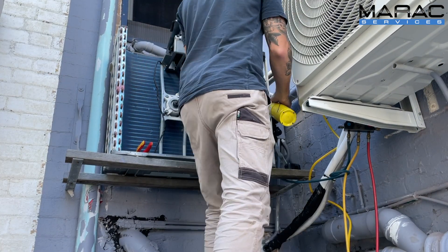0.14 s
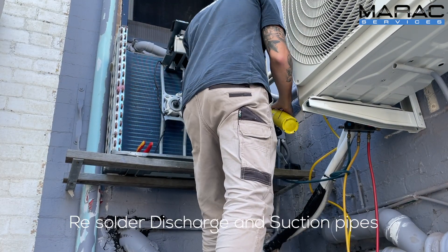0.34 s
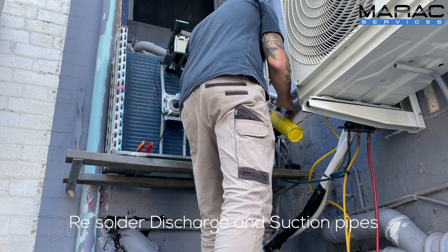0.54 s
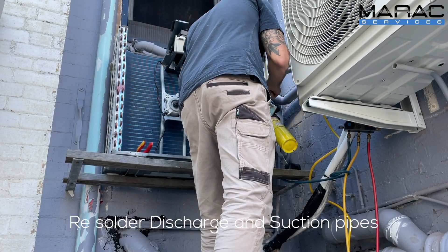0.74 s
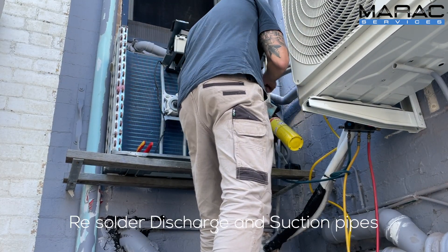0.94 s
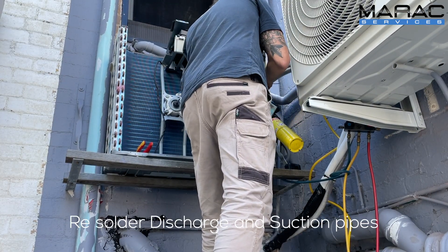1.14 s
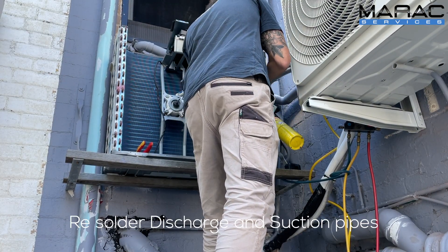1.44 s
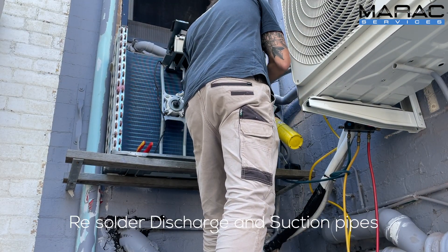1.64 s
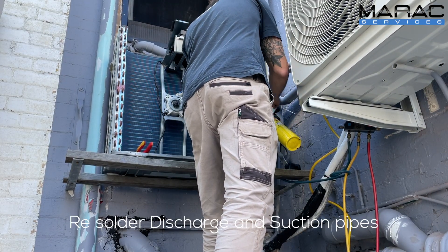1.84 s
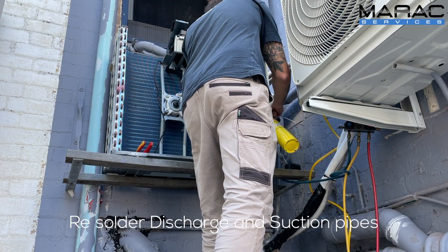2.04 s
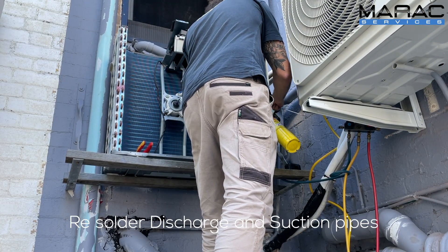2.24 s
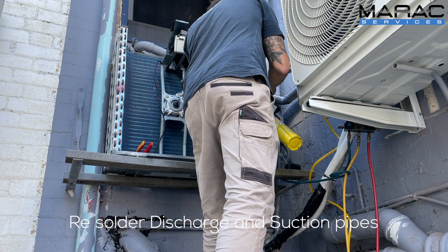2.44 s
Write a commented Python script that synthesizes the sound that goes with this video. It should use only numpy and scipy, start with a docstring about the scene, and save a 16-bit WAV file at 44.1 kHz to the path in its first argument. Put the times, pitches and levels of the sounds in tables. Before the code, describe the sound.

A handheld gas torch is knocked about, then its igniter snaps, gas hisses faintly, and the flame pops into a fluttering roar that cuts out briefly and returns, in stereo in an outdoor walled corner.

```python
"""Hand torch lit in an outdoor corner

Outdoors, in a corner of walls and sheet metal, a torch clacks and bumps in handling: noise bursts with decaying sines.
Its igniter snaps, cold gas whistles through the burner tube (resonant noise), and the flame catches with a pop.
The flame is fluttering, coloured noise: it roars, cuts out briefly, returns, sinks and settles.
Behind it lie a low outdoor rumble and a faint high whine; the stereo microphone rolls off at the very top."""
import sys
import numpy as np
from scipy.fft import rfft, irfft, next_fast_len
from scipy.io import wavfile
from scipy.ndimage import map_coordinates

SR = 44100
rng = np.random.default_rng(int(sys.argv[2]) if len(sys.argv) > 2 else 0)


def file_out(sig):
    """Save sig as 16-bit WAV at sys.argv[1]."""
    # one column per channel
    cols = np.atleast_2d(sig).T
    # limit, then scale
    lim = np.clip(cols, -1, 1)
    pcm = np.round(lim * 32767).astype(np.int16)
    wavfile.write(sys.argv[1], SR, pcm)


N = 114660

# Burning torch, before the trims in flame(): (time [s], roar level [dB], gas hiss level [dB])
FLAME_LEVELS = [(1.336, -95, -68), (1.344, -47, -62.5), (1.372, -51, -70.5), (1.394, -46.5, -67.5),
                (1.43, -49, -68.5), (1.585, -48.5, -69), (1.62, -68.5, -84), (1.662, -93, -100),
                (1.688, -48.5, -68.5), (1.76, -47, -65.5), (1.822, -49.5, -69.5), (1.868, -67, -77),
                (1.98, -62.5, -75.5), (2.03, -51.5, -69.5), (2.25, -48.5, -67.5), (2.6, -48.5, -66.5)]
# Colour of the flame's roar: (frequency [Hz], level [dB])
ROAR_COLOUR = [(60, -25), (150, -8), (280, -15.5), (450, -16.5), (690, -13), (800, 0), (1100, -7.5),
               (1600, -8.5), (2300, -17.5), (3500, -21.5), (6000, -42), (9000, -55)]
# Colour of the flame's gas hiss: (frequency [Hz], level [dB])
HISS_COLOUR = [(1000, -20), (2500, -4.5), (3800, -2), (5000, -2.5), (6600, 2), (7300, -8.5), (8500, -1),
               (10500, -13), (12800, -14.5), (13900, -25.5)]
# Resonances of the flame in its corner: (frequency [Hz], width [Hz], lift [dB])
CORNER_RESONANCES = [(391, 46, 12.5), (536, 24, 11), (1027, 64, 10.5), (1301, 148, 8), (1550, 95, -2.5),
                     (1721, 47, 10), (2118, 38, 8), (2454, 67, 6.5), (2844, 51, 6.5), (3340, 50, 9.5),
                     (3590, 85, 9.5), (4285, 250, 3), (4564, 88, 8.5), (4903, 165, 10.5)]
# Lean of the flame across the stereo image: (frequency [Hz], left over right [dB])
FLAME_LEAN = [(200, -4.5), (950, 0), (1650, -0.5), (2900, 1), (5000, 3.5), (8000, 0)]


def flame(flutter_db=1.0, flutter_rate=110, hiss_flutter_db=1.0, roar_db=1.5, hiss_db=4.5):
    """Turbulent roar and gas hiss, fluttering together and coloured by the corner."""
    roar_gain, hiss_gain = gains(FLAME_LEVELS)
    flutter = wobble(flutter_rate)

    def roar_colour(hz):
        return along(ROAR_COLOUR, hz) + lifts(CORNER_RESONANCES, hz)

    def hiss_colour(hz):
        return along(HISS_COLOUR, hz) + lifts(CORNER_RESONANCES, hz) * (hz > 2000)

    def lean(hz):
        return amp(along(FLAME_LEAN, hz) * np.array([[.5], [-.5]]))

    roar = rush(roar_colour) * roar_gain * amp(roar_db + flutter_db * flutter)
    hiss = rush(hiss_colour, comb_db=4.0) * hiss_gain * amp(hiss_db + hiss_flutter_db * flutter)
    return filtered(roar + hiss, lean)


# Level of the low rumble of combustion: (time [s], level [dB])
COMBUSTION_LEVEL = [(1.34, -65), (1.8, -63.5), (2.05, -61), (2.6, -57.5)]
# Colour of that rumble: (frequency [Hz], level [dB])
COMBUSTION_COLOUR = [(30, -16), (90, 2.5), (175, 2), (260, -11), (390, -7), (560, -6), (900, -42)]


def combustion():
    """Low noise from the burning gas, building once the flame is lit."""
    return gains(COMBUSTION_LEVEL)[0] * rush(lambda hz: along(COMBUSTION_COLOUR, hz))


# Flow of unlit gas: (time [s], level [dB])
COLD_GAS_LEVEL = [(.96, -100), (1.0, -81), (1.04, -67.5), (1.15, -66.5), (1.335, -67.5), (1.35, -110)]
# Colour of the unlit gas: (frequency [Hz], level [dB])
COLD_GAS_COLOUR = [(400, -1), (1100, 10), (1600, -5.5), (2500, -1), (5600, 1.5), (6700, -0.5), (7400, 11.5),
                   (9000, 3), (12600, -6), (13900, -10)]
# Resonances of the burner tube: (frequency [Hz], width [Hz], lift [dB])
TUBE_RESONANCES = [(1990, 220, 14), (2866, 110, 15), (3930, 110, 10), (4780, 98, 12), (5070, 350, 10.7),
                   (6280, 510, 14.5)]
# The tube's whistle, firming up just before ignition: (time [s], level [dB])
TUBE_WHISTLE_LEVEL = [(1.05, -93), (1.24, -84), (1.28, -77.5), (1.335, -80), (1.35, -110)]
WHISTLE_HZ, WHISTLE_WIDTH_HZ = 2940, 76


def cold_gas():
    """Unlit gas blows through the hollow burner tube, which whistles faintly."""
    jet = rush(lambda hz: along(COLD_GAS_COLOUR, hz) + lifts(TUBE_RESONANCES, hz), comb_db=2.5)
    whistle = rush(lambda hz: narrow_band(hz, WHISTLE_HZ, WHISTLE_WIDTH_HZ))
    return gains(COLD_GAS_LEVEL)[0] * jet + gains(TUBE_WHISTLE_LEVEL)[0] * whistle


# Igniter snap, then pops of the catching flame: (time [s], level at peak [dB], rise [s], t60 [s],
# tilt [dB per octave], ring [dB], left over right [dB], fizz above 7200 Hz [dB])
SNAP_HITS = [(.9265, -40.5, 0.001, 0.14, 0, 5.5, 1, -9), (.932, -28.5, 0.0017, 0.062, -0.5, -5, -1, 0.5),
             (1.343, -42.5, 0.0012, 0.099, -6.5, -11, 1.5, 15),
             (1.685, -50.5, 0.005, 0.09, -2.5, -17, 2, -1.5)]
# Colour of the snaps and pops: (frequency [Hz], level [dB])
SNAP_COLOUR = [(80, -34), (270, -6), (410, -13), (650, -3.5), (830, -4), (1100, 2), (1550, -2),
               (2300, -15.5), (3000, -17.5), (3600, -26.5), (6000, -27), (7300, -39.5), (8200, -33),
               (12200, -56), (13800, -59.5)]
# Ring of the burner head: (frequency [Hz], level [dB], t60 [s])
BURNER_RING = [(579.4, -10.5, 0.082), (752, -1, 0.076), (991, -9.5, .1), (1082, 5.5, 0.057),
               (1370, -11, 0.089), (1370, -5, 0.064), (1505, -14.5, 0.083), (1750, -17, 0.06)]


def snaps_and_pops():
    """The igniter's snap and the flame's pops set the burner head ringing."""
    return struck(SNAP_HITS, SNAP_COLOUR, BURNER_RING)


# Clacks of handling: (time [s], level at peak [dB], rise [s], t60 [s], tilt [dB per octave],
# ring [dB], left over right [dB], fizz above 7200 Hz [dB])
CLACK_HITS = [(.057, -51, 0.0077, 0.068, 0.5, -9, 0, -5), (.107, -29, 0.0032, 0.086, -3.5, -8.5, -3, 3.5),
              (.118, -30.5, 0.0035, 0.06, -5.5, -7.5, 2, 2), (.164, -29.5, 0.0038, 0.1, 1, 3.5, -2, -5.5),
              (0.238, -44.5, 0.0018, 0.087, -3.5, -10, -4, 12), (0.3, -60.5, 0.0023, 0.21, -2, -21, 2, 7)]
# Colour of the clacks: (frequency [Hz], level [dB])
CLACK_COLOUR = [(80, -23), (250, -21), (450, -3.5), (600, -3), (850, 2), (1150, -2), (1600, -7.5),
                (2400, -20), (3500, -27.5), (5500, -30.5), (6600, -34.5), (7300, -45), (8500, -39.5),
                (12300, -53.5), (14000, -82)]
# Ring of the handled torch: (frequency [Hz], level [dB], t60 [s])
BODY_RING = [(447, -24, 0.096), (622, -7, 0.095), (814, -6, 0.072), (884, -12.5, 0.09), (1062, 1.5, 0.038),
             (1108, 5, 0.051), (1167, -5.5, 0.027), (1357, -4, 0.06), (1575, -15, 0.094),
             (1896, -37, 0.045)]


def handling_clacks():
    """Knocks on the torch set its body ringing."""
    return struck(CLACK_HITS, CLACK_COLOUR, BODY_RING)


# The walls' answer to a hit: level, decay, extra tilt in dB per octave
TAIL_DB, TAIL_T60_S, TAIL_TILT_DB = -20.5, 0.41, -4
RING_SKEW = .35  # the ring reaches the two ears out of step (radians each way)


def struck(hits, colour, modes, ring_attack_s=.0004, grain_db=3.0, grain_rate=900):
    """Each hit is a short grainy rattle, a ring of the struck part and a dull tail from the walls."""
    out = np.zeros((2, N))
    ears = np.array([[1], [-1]])

    def octaves(hz):
        return np.log2(np.clip(hz, 250, 4000))

    for s, db, rise, t60, tilt, ring_db, pan, fizz_db in hits:
        def rattle_colour(hz):
            return along(colour, hz) + tilt * octaves(hz) + fizz_db * (hz > 7200)

        def tail_colour(hz):
            return along(colour, hz) + (tilt + TAIL_TILT_DB) * octaves(hz)

        rattle = rush(rattle_colour) * strike(s, rise, t60)
        # Only the treble of the rattle is grainy.
        treble = filtered(rattle, lambda hz: 1 / (1 + (2500 / (hz + 1)) ** 4))
        grain = unit(amp(grain_db * wobble(grain_rate)))
        rattle = rattle + treble * (grain - 1)
        tail = rush(tail_colour) * strike(s, rise, TAIL_T60_S)

        t = np.maximum(clock() - s, 0)
        ring = np.zeros((2, N))
        for hz, level, life in modes:
            tone = np.sin(2 * np.pi * hz * t + RING_SKEW * ears)
            ring += amp(level) * np.exp(-np.log(1000) * t / life) * tone
        ring *= 1 - np.exp(-t / ring_attack_s)
        out += amp(db + pan * ears / 2) * (rattle + amp(TAIL_DB) * tail + amp(ring_db) * ring)
    return out


# Dull bumps of handling and of the flame catching: (time [s], level at peak [dB], rise [s], t60 [s])
BUMPS = [(.005, -48, 0.03, 0.53), (0.114, -38.5, 0.0089, 0.17), (0.253, -45, 0.0065, .3),
         (0.933, -50.5, 0.0018, 0.32), (1.347, -49, 0.0041, 0.29)]
# Colour of the bumps: (frequency [Hz], level [dB])
BUMP_COLOUR = [(20, -5.5), (45, -3), (105, 1.5), (150, -7.5), (220, -4.5), (500, -58.5)]


def bumps():
    """Low noise bursts with no ring."""
    envelope = sum(amp(db) * strike(s, rise, t60) for s, db, rise, t60 in BUMPS)
    return envelope * rush(lambda hz: along(BUMP_COLOUR, hz))


# Hollow note begun before the start: (time [s], frequency [Hz], level [dB], t60 [s])
HOLLOW_NOTE = (-0.23, 107, -32, 0.22)


def boom(attack_s=0.0046):
    """One low, damped sine, of which only the last of the decay is left."""
    s, hz, db, t60 = HOLLOW_NOTE
    t = np.maximum(clock() - s, 0)
    envelope = (1 - np.exp(-t / attack_s)) * np.exp(-np.log(1000) * t / t60)
    return amp(db) * np.sin(2 * np.pi * hz * t) * envelope


# Rustle of work clothes: (time [s], level [dB])
RUSTLE_LEVEL = [(0, -51), (.045, -60.5), (.085, -60), (.2, -58.5), (.31, -63), (.4, -87.5)]
# Colour of the cloth: (frequency [Hz], level [dB])
CLOTH_COLOUR = [(100, 5.5), (350, 7), (1100, -4.5), (1800, -14.5), (3500, -23.5), (6000, -34),
                (7500, -28.5), (12000, -37.5), (14000, -59)]


def rustle():
    """Soft noise of clothes brushing as the torch is brought into place."""
    return gains(RUSTLE_LEVEL)[0] * rush(lambda hz: along(CLOTH_COLOUR, hz))


# Colour of the outdoor background: (frequency [Hz], level [dB])
OUTDOOR_COLOUR = [(15, -20), (25, -27.5), (53, -3.5), (120, -7), (175, -6.5), (215, -13), (290, -15),
                  (380, -19.5), (540, -25.5), (900, -27.5), (1500, -35.5), (3300, -50.5), (5000, -58.5),
                  (14000, -67)]
OUTDOORS_DB = -61.5
# Faint high whine, before its band levels: (time [s], level [dB])
HIGH_WHINE_LEVEL = [(0, -87.5), (.08, -84), (.2, -93.5), (2.6, -92)]
# Bands of the whine: (frequency [Hz], width [Hz], level [dB])
WHINE_BANDS = [(8950, 390, -2.5), (11970, 200, -4)]


def outdoors(sway_db=1.53):
    """A low, gently swaying rumble with a faint high whine of narrow noise bands."""
    rumble = rush(lambda hz: along(OUTDOOR_COLOUR, hz))
    rumble = rumble * amp(OUTDOORS_DB + sway_db * wobble(7.49))
    whine = np.zeros((2, N))
    for centre, width, db in WHINE_BANDS:
        whine += amp(db) * rush(lambda hz: narrow_band(hz, centre, width))
    return rumble + gains(HIGH_WHINE_LEVEL)[0] * whine


# Stereo width at the microphone: (frequency [Hz], side over mid [dB])
STEREO_WIDTH = [(60, -17), (170, -13.5), (280, -2.5), (490, -2), (1000, -4.5), (1420, 3), (2020, -6.5),
                (3000, -2), (5000, -5.5), (6500, 5), (7500, 11), (9000, 4), (10500, -14.5), (13000, 6)]


def rush(colour, diffuse=0.45, comb_db=0):
    """Stereo noise of rms 1 from one spot, partly diffuse; close walls can comb its treble."""
    direct, stray = rng.standard_normal((2, N))
    # The side signal is part phase-scrambled direct noise, part independent noise.
    scattered = filtered(direct, lambda hz: np.exp(1j * np.angle(reflections(hz))))
    across = np.sqrt(1 - diffuse) * scattered + np.sqrt(diffuse) * stray

    def shape(hz):
        turn = np.arctan(amp(along(STEREO_WIDTH, hz)))
        comb = comb_db * reflections(hz, spread_s=0.01).real * (hz > 5200) if comb_db else 0
        return amp(colour(hz) + comb) * np.array([np.cos(turn), np.sin(turn)])

    mid, side = filtered(np.array([direct, across]), shape)
    return unit(np.array([mid + side, mid - side]))


def reflections(hz, spread_s=0.0069, count=12):
    """Response of rms 1 of a few close, randomly spaced wall reflections."""
    delay = rng.random(count) * spread_s
    size = rng.standard_normal(count)
    echoes = np.bincount((delay * SR).astype(int), size, minlength=2 * len(hz) - 2)
    return rfft(echoes) / np.linalg.norm(size)


def strike(s, rise, t60):
    """An envelope that swells exponentially up to time s and dies away by 60 dB in t60."""
    t = clock() - s
    return np.exp(np.minimum(t, 0) / rise - np.log(1000) * np.maximum(t, 0) / t60)


def narrow_band(hz, centre, width):
    """Level in dB of a resonant band, 6 dB down at the edges of its width."""
    return -20 * np.log10(1 + (2 * (hz - centre) / width) ** 2)


def lifts(peaks, hz):
    """dB added by bell-shaped resonances."""
    return sum(db * .5 ** ((2 * (hz - centre) / width) ** 2) for centre, width, db in peaks)


def filtered(x, response):
    """x times a response of frequency."""
    m = next_fast_len(N + SR // 4)
    return irfft(rfft(x, m) * response(np.fft.rfftfreq(m, 1 / SR)), m)[..., :N]


def wobble(rate):
    """A smooth random curve, rate knots a second."""
    return map_coordinates(rng.standard_normal(int(N * rate / SR) + 4), [clock() * rate])


def gains(rows):
    """A gain per sample for each dB column, silent before the first row."""
    s, *columns = np.transpose(rows)
    return [amp(np.interp(clock(), s, column)) * (clock() >= s[0]) for column in columns]


def along(points, hz):
    """(Hz, value) points interpolated on a log frequency axis."""
    f, v = np.transpose(points)
    return np.interp(np.log(hz + 1), np.log(f + 1), v)


def clock():
    """Time of each sample in seconds."""
    return np.arange(N) / SR


def amp(db):
    """Amplitude ratio of a level in dB."""
    return 10 ** (np.asarray(db) / 20)


def unit(x):
    """x scaled to rms 1."""
    return x / np.sqrt(np.mean(x ** 2) + 1e-20)


def scene():
    """Flame, ignition and handling over the outdoor background."""
    burning = flame() + combustion()
    ignition = cold_gas() + snaps_and_pops()
    handling = handling_clacks() + bumps() + boom() + rustle()
    return burning + ignition + handling + outdoors()


# The microphone's roll-off at the very top: (frequency [Hz], level [dB])
MICROPHONE_RESPONSE = [(12600, 0), (13400, 0.5), (14200, -3.5)]
TOP_HZ = 15700


def record(dry):
    """The microphone's top rolls off, and nothing is kept above the band limit."""
    return filtered(dry, lambda hz: amp(along(MICROPHONE_RESPONSE, hz)) * (hz < TOP_HZ))


dry = scene()
out = record(dry)
file_out(out)
```